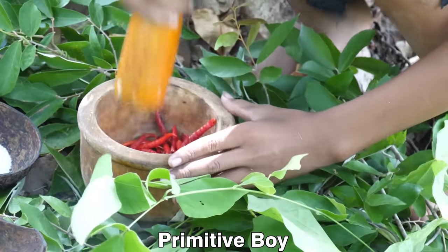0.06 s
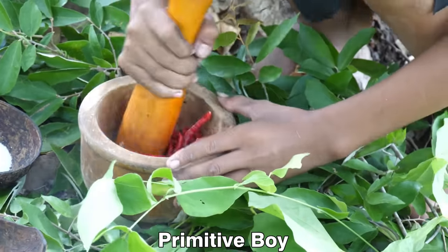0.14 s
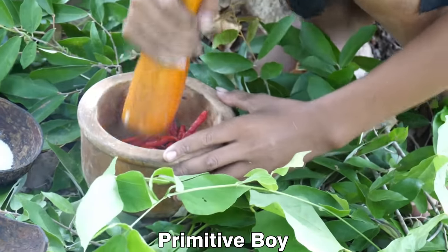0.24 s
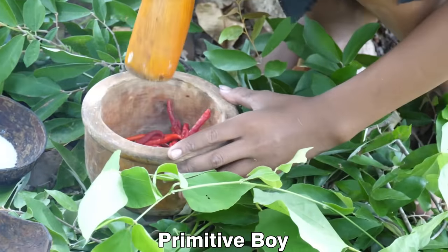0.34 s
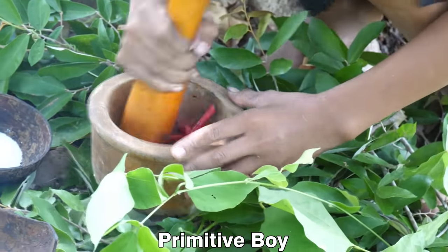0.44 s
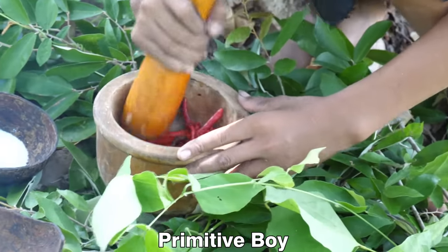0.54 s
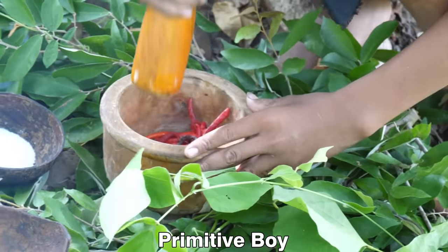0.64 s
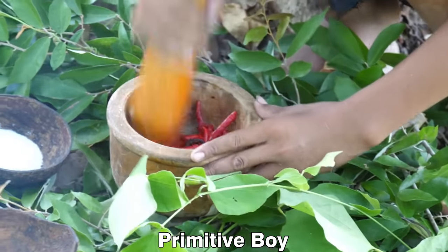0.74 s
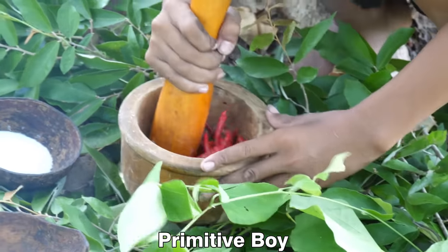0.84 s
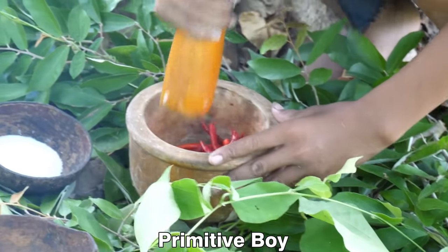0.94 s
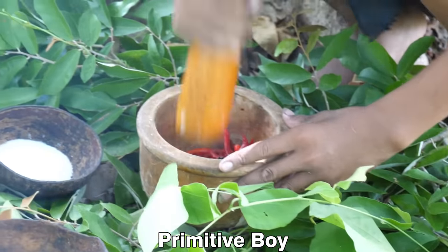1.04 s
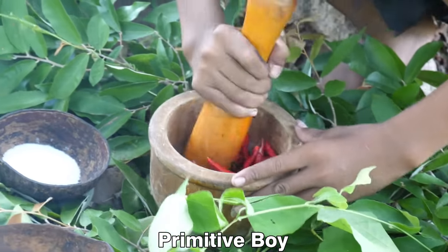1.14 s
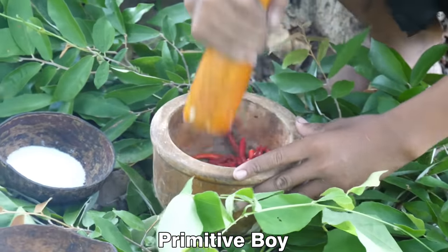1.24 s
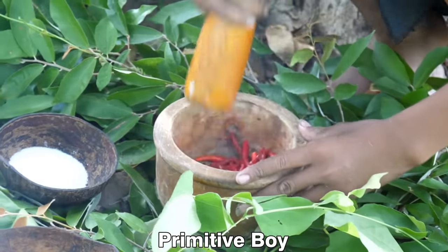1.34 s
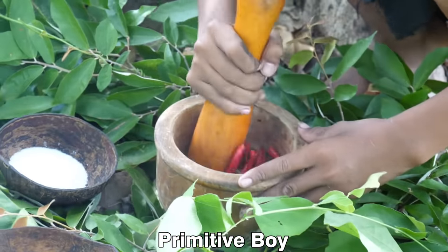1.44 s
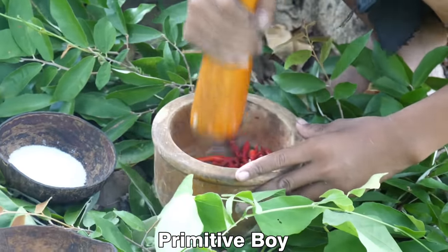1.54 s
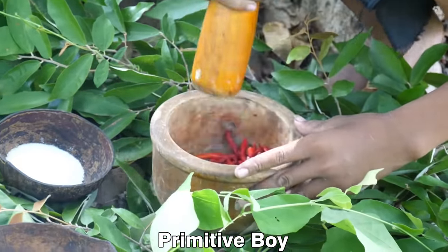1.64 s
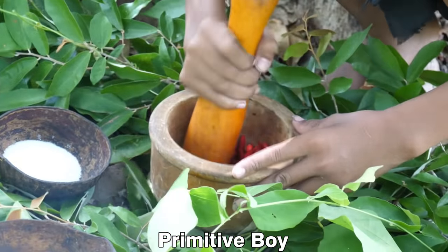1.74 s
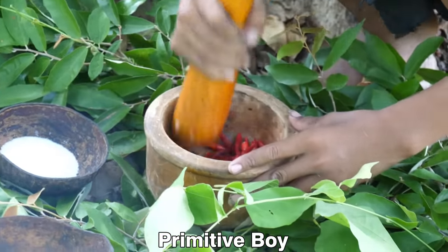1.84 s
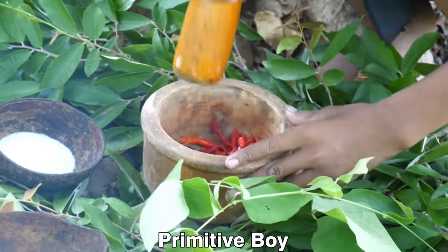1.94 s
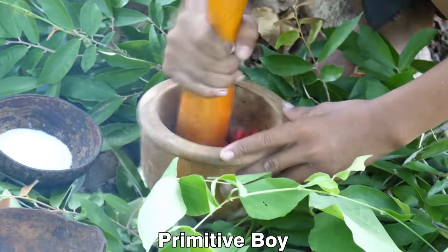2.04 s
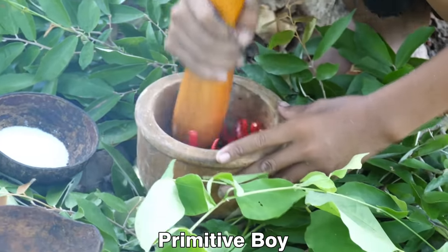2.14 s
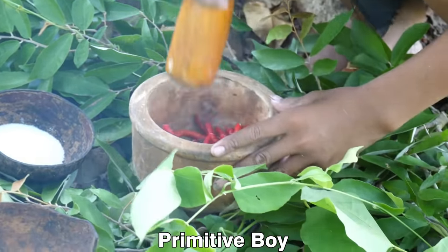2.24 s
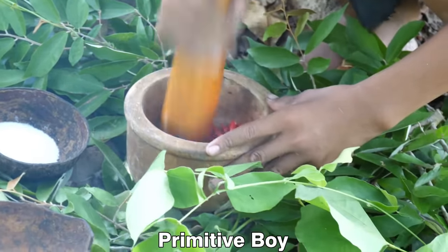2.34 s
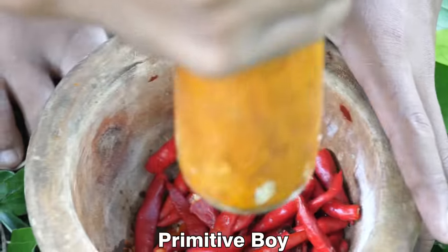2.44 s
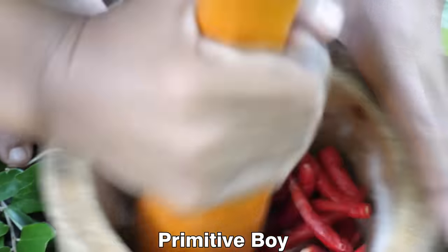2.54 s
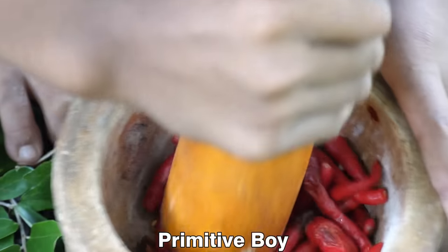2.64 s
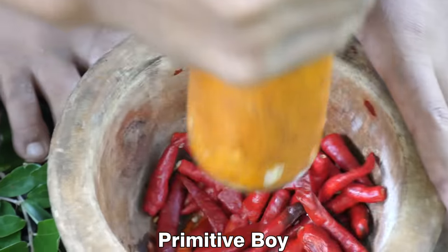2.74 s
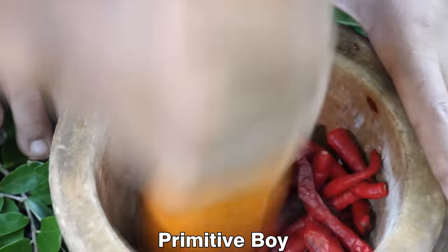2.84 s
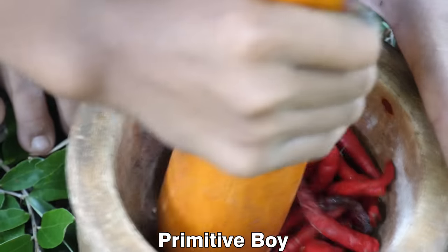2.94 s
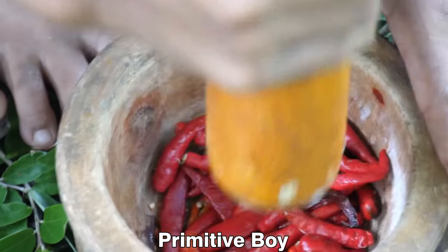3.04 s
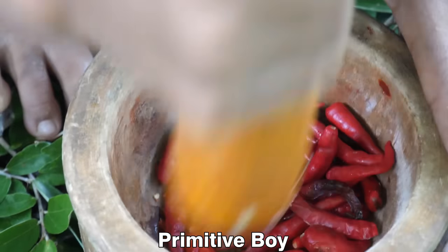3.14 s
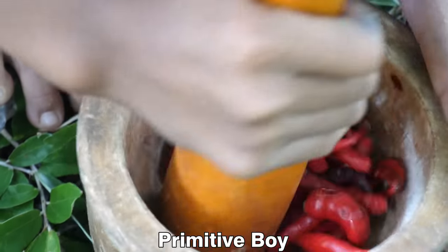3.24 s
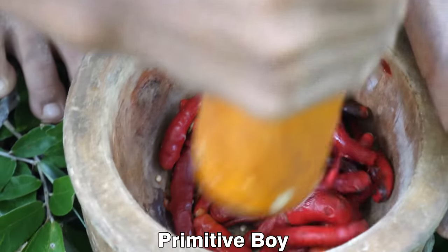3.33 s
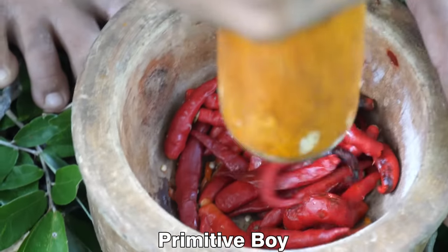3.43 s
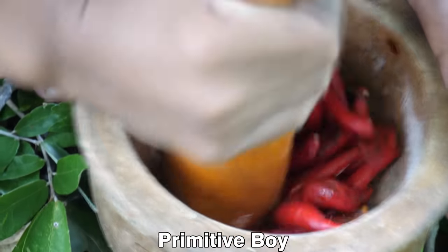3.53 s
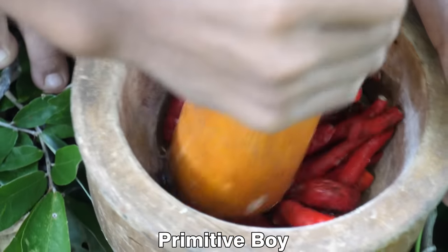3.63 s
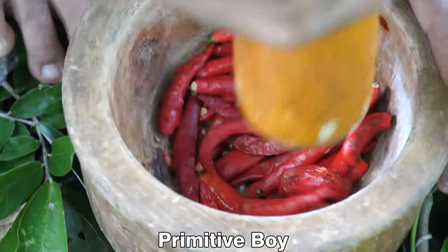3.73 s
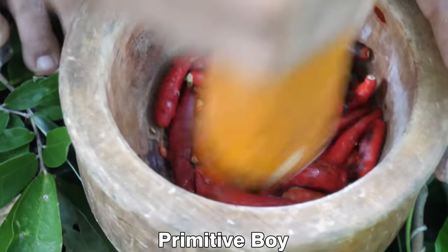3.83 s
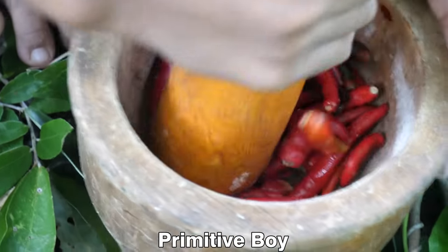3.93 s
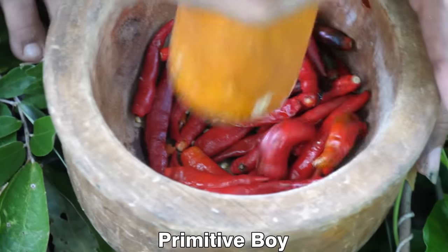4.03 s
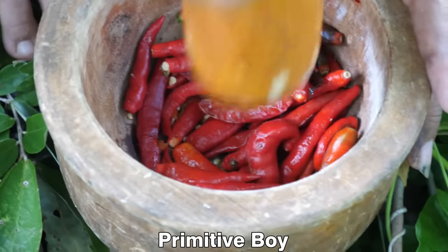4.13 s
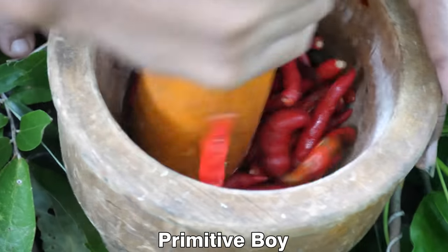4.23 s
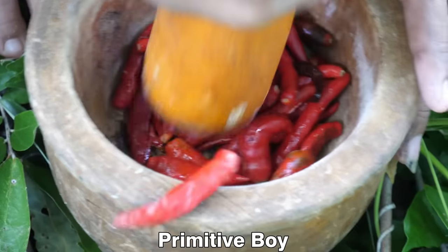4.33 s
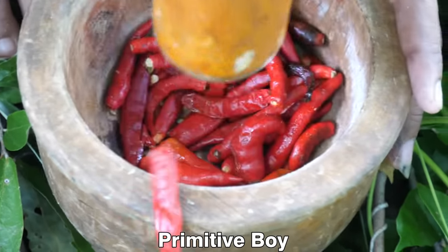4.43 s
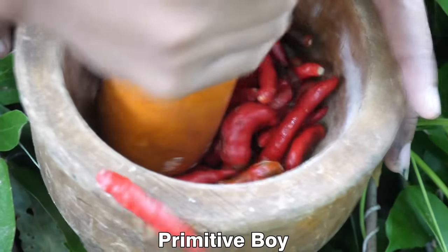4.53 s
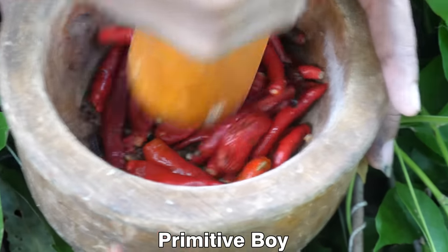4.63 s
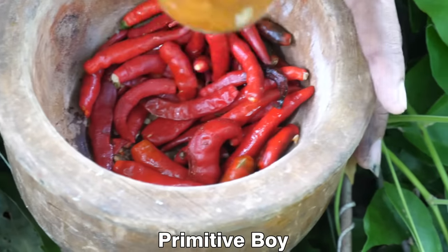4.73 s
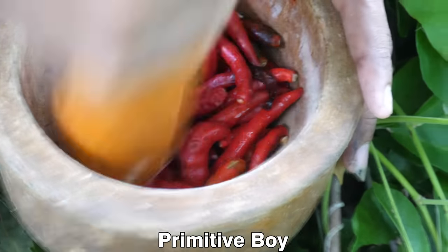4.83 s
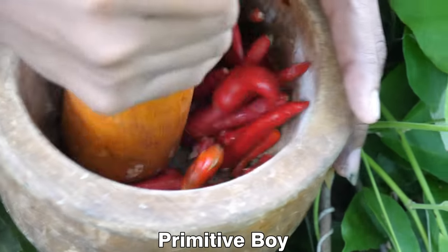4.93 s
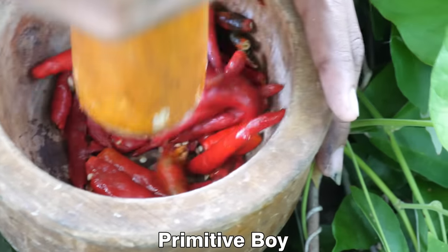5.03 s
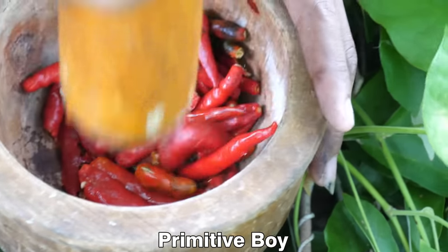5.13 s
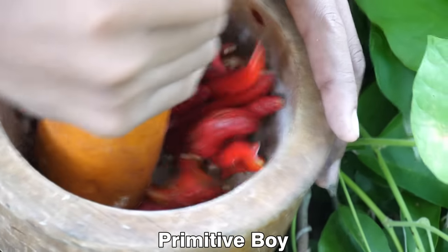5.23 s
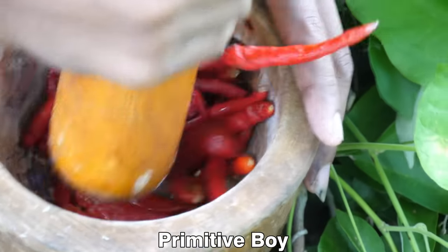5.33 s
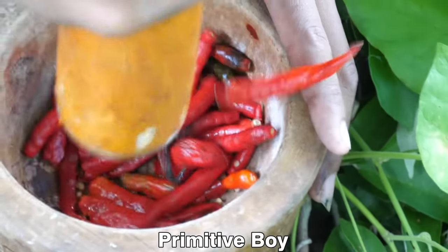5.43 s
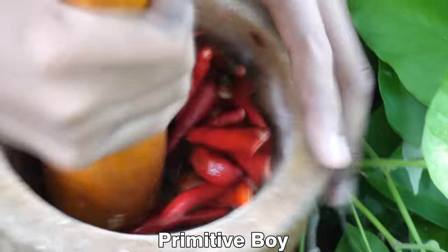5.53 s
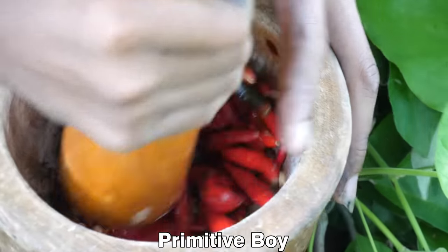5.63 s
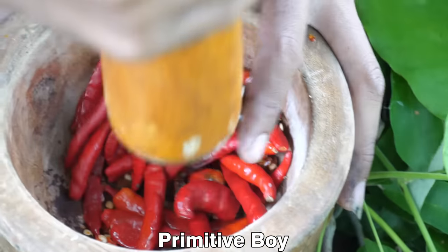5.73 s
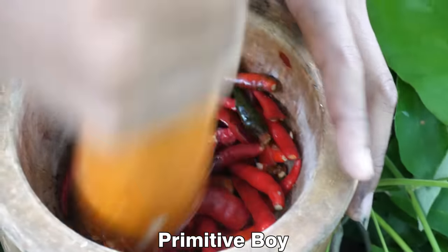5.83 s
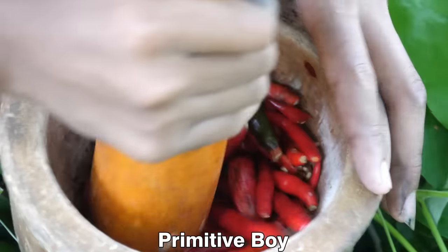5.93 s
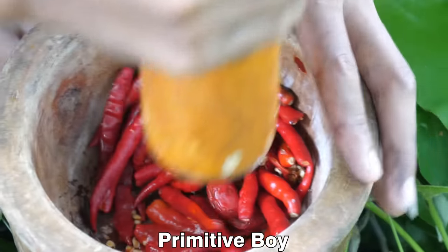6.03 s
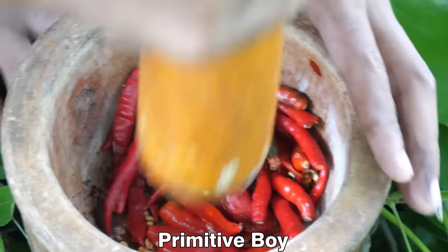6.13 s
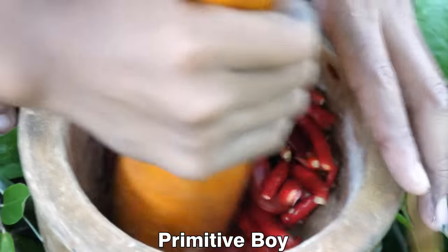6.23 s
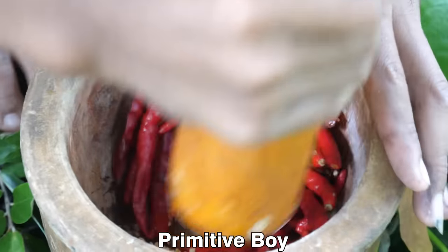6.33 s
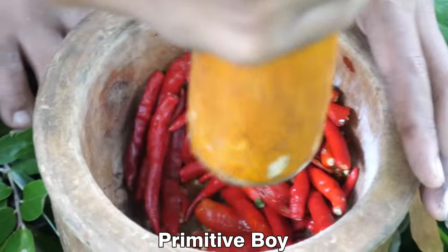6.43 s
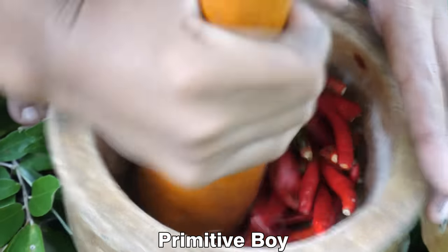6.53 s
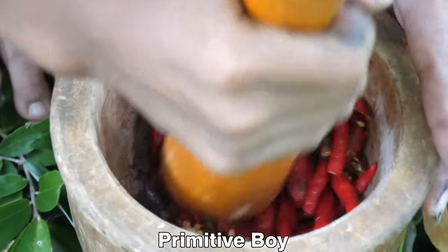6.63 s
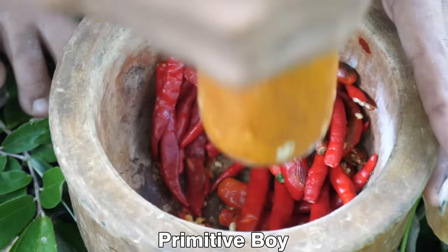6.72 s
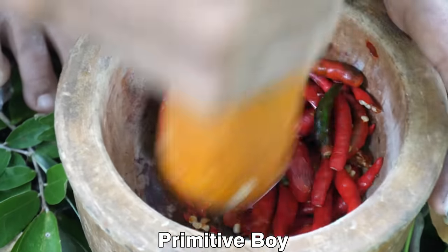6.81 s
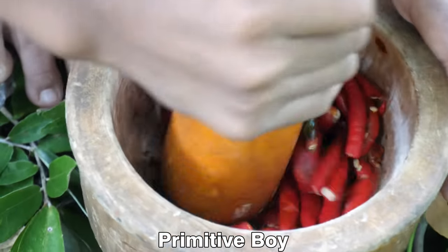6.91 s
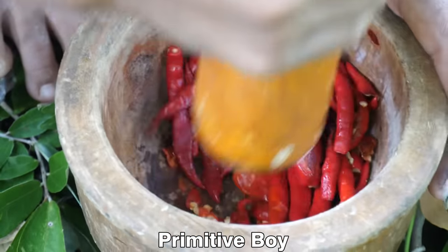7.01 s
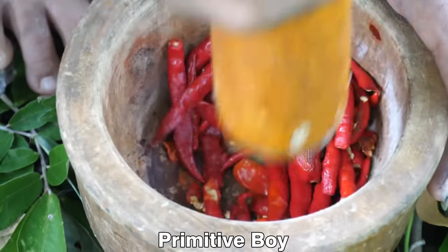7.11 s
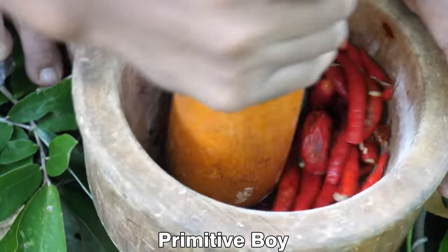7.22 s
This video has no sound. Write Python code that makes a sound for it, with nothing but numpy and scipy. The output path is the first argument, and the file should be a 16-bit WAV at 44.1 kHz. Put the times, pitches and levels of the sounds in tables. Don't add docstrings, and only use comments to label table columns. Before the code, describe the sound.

Close outdoor microphone on a wooden mortar on soft ground. Leaves rustle over low forest air, then a wooden pestle strikes about three times a second. Each blow has a short wet crunch, hollow knock and brief woody ring. Seeds tick and wet skin squeaks faintly between blows. From about 2.6 seconds the knocks grow louder and overload, while the background sinks.

```python
import sys
import numpy as np
from scipy import signal
from scipy.io import wavfile
from scipy.ndimage import uniform_filter1d

SR = 44100
rng = np.random.default_rng(int(sys.argv[2]) if len(sys.argv) > 2 else 0)


def boost_factor(decibels):
    exponent = np.asarray(decibels, float) / 20
    return 10 ** exponent


def int16_out(signal):
    q = np.round(np.clip(np.atleast_2d(signal).T, -1, 1) * 32767)
    wavfile.write(sys.argv[1], SR, q.astype(np.int16))


N = 320607


def rms_one(x):
    return x / np.sqrt(np.mean(x ** 2) + 1e-20)


def at_hz(points, hz):
    point_hz, point_db = np.transpose(points)
    return np.interp(np.log(hz), np.log(point_hz), point_db)


def add(out, s, sound):
    i = round(s * SR)
    out[i:i + len(sound)] += sound[:N - i]


def drift(rate):
    r = np.exp(-80 * np.pi * rate / SR)
    white = rng.standard_normal(N // 40 + 2002)
    slow = signal.lfilter([1], [1, -2 * r, r * r], white)[2000:]
    return np.interp(np.arange(N) / 40, np.arange(len(slow)), rms_one(slow))


def damped(hz, t60):
    t = np.arange(SR // 5) / SR
    return np.sin(2 * np.pi * hz * t) * boost_factor(-60 * t / t60)


def butter(x, order, hz, kind):
    return signal.sosfilt(signal.butter(order, hz, kind, fs=SR, output="sos"), x)


def band(x, hz, octaves, order=1):
    edges = np.clip(hz * 2. ** np.array([-octaves, octaves]), 30, 19000)
    return rms_one(butter(x, order, edges, "band"))


# frequency in Hz, side minus mid in dB.
WIDTH = [(60, -13), (110, -33.5), (200, -18), (380, -21.5), (700, -24.5), (1290, -22.5), (2380, -22.5),
         (4400, -18.5), (8120, -17), (15000, -10)]


def noise(spectrum, patchy_db, grit_db):
    out, together = 0, drift(16)
    edges = 22 * 2 ** np.arange(0, 10, .5)
    white = rng.standard_normal((2, 2, N)) * boost_factor(grit_db * drift(160))
    for k, (low, high) in enumerate(zip(edges, edges[1:])):
        mid, side = butter(white[k % 2], 2, [low, high], "band")
        hz = np.sqrt(low * high)
        gain = boost_factor(at_hz(spectrum, hz) + patchy_db * (.5 * together + drift(4.2)))
        out = out + gain * (mid + boost_factor(at_hz(WIDTH, hz)) * side * [[1], [-1]])
    return rms_one(out)


# frequency in Hz, density in dB per Hz.
FOREST = [(15, -37), (25, -8.5), (129, -1.5), (182, -4.5), (350, -15), (486, 1), (728, -16), (883, -7),
          (1490, -15.5), (2500, -15), (3250, -40), (5500, -120)]


def forest_air():
    return noise(FOREST, patchy_db=2.5, grit_db=2.1)


# frequency in Hz, density in dB per Hz.
RUSTLE = [(530, -31.5), (900, -3.5), (1910, -8.5), (4560, -1), (5410, -11.5), (6640, -6), (7500, -9.5),
          (8160, -8.5), (14600, -17.5), (16300, -34)]


def rustle():
    leaves = noise(RUSTLE, patchy_db=1.7, grit_db=2.2)
    return [rms_one(butter(leaves, 3, 4500, side)) for side in ("low", "high")]


# level in dB, in the order of the blows.
DUCKED_DB = [-46, -54.5, -49, -48, -52.5, -52.5, -54, -51, -60.5, -60.5, -60, -57.5, -58.5, -58, -60.5, -53,
             -53, -46, -62, -56, -57.5, -52]
# time in seconds, level in dB.
CEILING = [(0, -36.5), (1.8, -42.5), (2.9, -41.5), (3.3, -45), (4.6, -50.5), (5.0, -54.5), (6.3, -50.5),
           (6.7, -57.5), (7.27, -56)]
# time in seconds, level in dB.
STIR = [(0, 4), (.14, 0), (.21, 4), (.36, -2.2), (.8, 1.5), (1.38, -1), (1.5, -2.5), (1.76, 9.5),
        (1.82, -1), (2.38, -4.5), (2.5, -0.7), (2.79, -5), (3.3, -1), (3.78, -7), (4.55, -6.5),
        (5.93, -5.6), (6.28, -7.5), (7.27, -9)]
START_DB, RECOVER_DB_PER_S = -42, 31
RUB_PER_DUCK, HISS_DB, HISS_PER_DUCK = 0.13, -1.3, 0.17


def gain_control():
    t = np.arange(N) / SR
    times = np.array([0, *(row[0] for row in BLOWS)])
    last = np.searchsorted(times, t, side="right") - 1
    ceiling_db = np.interp(t, *np.transpose(CEILING))
    climbing_db = np.array([START_DB, *DUCKED_DB])[last] + RECOVER_DB_PER_S * (t - times[last])
    air_db = uniform_filter1d(np.minimum(climbing_db, ceiling_db), size=221)
    duck_db = air_db - ceiling_db
    rub_db = air_db + np.interp(t, *np.transpose(STIR)) + RUB_PER_DUCK * duck_db
    return boost_factor(air_db), boost_factor(rub_db), boost_factor(rub_db + HISS_DB + HISS_PER_DUCK * duck_db)


# start in seconds, length in seconds, pitch in Hz, level in dB.
SQUEAKS = [
    (.05, .12, 4600, -43),
    (1.42, .04, 1680, -38),
    (1.66, .13, 4550, -44),
    (1.67, .07, 6450, -43),
    (1.66, .09, 8100, -50),
    (2.84, .06, 2100, -43),
    (2.83, .07, 950, -48),
    (2.85, .06, 5200, -53),
    (2.84, .06, 3100, -47),
    (4.83, .06, 1980, -55),
]


def squeaks():
    out = np.zeros(N)
    for (s, length, hz, db), white in zip(SQUEAKS, rng.standard_normal((len(SQUEAKS), SR // 5))):
        swell = np.sin(np.pi * np.clip(np.arange(len(white)) / SR / length, 0, 1))
        add(out, s, boost_factor(db) * band(white, hz, 190 / hz, order=2) * swell)
    return out


# start in seconds, peak in dB, pitch in Hz, bright edge in dB.
TICKS = [(0.0718, -22, 4320, -19.5), (.1396, -15.5, 2720, -26), (.753, -22.5, 2680, -4.5),
         (1.3562, -20.5, 6660, -15.5), (1.431, -23, 1640, -8.5), (1.5336, -36, 6300, 4),
         (1.845, -26.5, 1750, -8), (1.871, -24.5, 1260, -28), (2.369, -22.5, 1840, -6.5),
         (2.471, -25, 4080, -11), (2.5325, -28, 1570, -19), (2.6893, -34, 6500, -17),
         (2.7235, -24.5, 4130, -15), (2.7394, -20, 5060, -9.5), (2.801, -19, 4190, -12),
         (2.822, -23, 2730, -17), (2.836, -18.5, 2160, -2.5), (3.803, -30, 3870, -29),
         (3.8192, -32.5, 1980, -24), (4.3844, -37, 1880, -1.5), (4.454, -30, 2650, -22.5),
         (4.4918, -27.5, 5080, -10.5), (4.87, -30, 1430, -6), (5.009, -42.5, 1215, 6),
         (5.194, -32, 2150, -11), (5.745, -32.5, 2430, -27), (5.8422, -27.5, 4170, -26),
         (5.888, -27.5, 1190, -8.5), (6.168, -33, 3030, -2.5), (7.0723, -47.5, 1880, -22)]
# start in seconds, peak in dB, pitch in Hz.
FAINT_TICKS = [(.608, -40, 2840), (2.2832, -33, 4550), (2.443, -35.5, 3300), (2.7646, -39.5, 2187),
               (3.4201, -46, 2050), (4.3445, -33, 4800), (4.4003, -36, 2780), (4.7522, -41.5, 1960),
               (5.7004, -37, 2900), (5.8664, -47, 3470), (6.1938, -37.5, 2300)]
FAINT_EDGE_DB, TICK_DECAY_MS = -15, 2.96


def ticks():
    out, t = np.zeros(N), np.arange(SR // 25) / SR
    snaps = [*TICKS, *((*row, FAINT_EDGE_DB) for row in FAINT_TICKS)]
    envelope = np.exp(-t * 1000 / TICK_DECAY_MS) * (1 - np.exp(-t / 0.00046))
    for (s, db, hz, edge_db), white in zip(snaps, rng.standard_normal((len(snaps), len(t)))):
        colour = band(white, hz, 0.15) + boost_factor(edge_db) * band(white, 7000, 0.97)
        add(out, s, boost_factor(db - 6) * colour * envelope)
    return out


# resonance in Hz, width in Hz, level in dB.
BOWL = [(950, 98, 1.2), (1550, 610, -6.5), (2150, 362, 1), (3183, 367, -1.5)]


def hollow(x):
    out = 0
    for k, (hz, width_hz, db) in enumerate(BOWL):
        r = np.exp(-np.pi * width_hz / SR)
        poles = [1, -2 * r * np.cos(2 * np.pi * hz / SR), r * r]
        out = out + (-1) ** k * boost_factor(db) * signal.lfilter([1 - r * r, 0, r * r - 1], poles, x)
    return rms_one(out)


# start in seconds, length in ms, level in dB, centre in Hz.
CRUSHES = [(.164, 5.9, -7, 3780), (.488, 6.5, -10, 2980), (.8, 31, -32.5, 2827), (1.128, 11.0, -9, 3030),
           (1.461, 3.3, -4, 2680), (1.784, 4.7, -10.5, 3500), (2.588, 13, -14.5, 3680),
           (2.914, 4.8, -7.5, 3550), (3.2334, 5.7, -13, 4180), (3.573, 3.56, -7.5, 2280),
           (3.914, 7.9, -11, 4620), (4.239, 8.9, -15, 3480), (4.563, 6.4, -11.5, 5040),
           (4.897, 6.1, -6, 2260), (5.249, 5.2, -12.5, 2280), (5.569, 2.9, -11, 2130),
           (5.906, 11.2, -21, 1830), (6.245, 8.3, -11.5, 2720), (6.5745, 3.5, -8.5, 2250),
           (6.904, 4.3, -12, 2410), (7.221, 7.7, -28.5, 4100), (7.231, 3.1, -21.5, 8900)]
# start in seconds, length in ms, level in dB, centre in Hz.
POPS = [
    (0.7991, 4.2, -24.5, 3283),
    (.808, 3.2, -18, 3300),
    (1.104, 36, -35, 3000),
    (1.141, 19, -26.5, 4000),
    (1.372, 15, -19, 5970),
    (1.3725, 6.8, -18, 6500),
    (1.379, 6, -22, 3070),
    (5.9128, 4.3, -16.5, 5764),
    (6.238, 6.3, -30, 2698),
]
CRUSH_SWELL, POP_SWELL = 0.59, 0.12


def crushes():
    out, t = np.zeros(N), np.arange(SR // 12) / SR
    bursts = [(*row, CRUSH_SWELL) for row in CRUSHES] + [(*row, POP_SWELL) for row in POPS]
    shape = (len(bursts), len(t))
    draws = rng.standard_normal(shape) * rng.exponential(1, shape) ** .9
    sizzle = boost_factor(-23.5) * np.exp(-t / 0.016)
    for (s, length_ms, db, hz, swell), snaps in zip(bursts, draws):
        length = length_ms / 1000
        rise = np.clip(t / (swell * length), 0, 1) ** 1.5
        fall = np.exp(-np.maximum(t - length, 0) / 0.0011) + sizzle
        pods = band(snaps, hz, 0.69, order=2)
        in_bowl = 0.52 * (3000 / hz) ** 0.64 * hollow(snaps)
        colour = pods + in_bowl + 0.085 * band(snaps, 5800, 0.76)
        add(out, s, boost_factor(db - 3.0) * colour * rise * fall)
    return out


# start in seconds, knock peak in dB, knock in Hz, pestle ring in dB, crack in dB.
BLOWS = [(0.1713, -4.5, 462, -22.5, -3.5), (.4942, 4, 950, -13.5, -4.5), (.817, -1, 1070, -7, -6),
         (1.1389, 2.3, 766, -23, -14), (1.4645, 4, 924, -9, -17), (1.7897, -.6, 473, -17, -10.5),
         (2.0988, -5.5, 1040, -7.5, -2.8), (2.601, 4, 643, -39.5, -11), (2.9206, 8, 680, -28, -11.5),
         (3.2387, 6.5, 950, -11, -15), (3.5789, 0.5, 914, -27, -5.5), (3.922, 10, 690, -20.5, -8.5),
         (4.2456, 11, 698, -13, 2), (4.5699, 10, 712, -21, -4.5), (4.9078, 2.5, 904, -36.5, -29.5),
         (5.2578, -3, 710, -41, -33), (5.5758, 1.3, 780, -43.5, -12), (5.9151, 5.5, 1026, -20, 2),
         (6.2511, 8, 937, -20, -12), (6.5768, 6, 695, -9, -2.5), (6.9065, 7.5, 816, -26, -6.5),
         (7.2359, 3, 707, -34, -10.5)]
# start in seconds, knock peak in dB, knock in Hz,
# pestle ring in dB, crack in dB.
TOUCHES = [(0.1668, -15.5, 1288, -35, 5), (0.4935, -2, 1523, -2.5, 8), (0.8021, -9.5, 990, -12.5, -7.5),
           (.811, -5.5, 1055, -8.5, -2.5), (1.1343, -5.5, 1152, -51, 5), (1.4638, -0.5, 1197, -20.5, -6),
           (1.7914, -0.5, 890, -28, -24.5), (2.0914, -5.5, 1190, -4, 0), (2.5934, -3.5, 896, -27, -5.5),
           (2.5981, 2.6, 1016, -42, -5), (2.9183, 3, 938, -30.5, 4), (3.2403, 5.8, 811, -38, -23.5),
           (3.5711, -15, 1060, -27.5, -19), (3.575, 4, 1195, -30, -0.8), (3.5761, 0.5, 900, -10, -27),
           (4.2451, 3.5, 1513, -32, -20.5), (4.8999, 6.5, 1500, -8, -6), (5.2498, 2.5, 1300, -28, -30),
           (5.2522, 1, 1042, -13.5, 0.5), (5.5692, 3, 1291, -14, -8), (5.5734, -10.5, 930, -29, -25.5),
           (6.252, 4.5, 861, -23, -12.5), (6.5778, -5, 802, -32, -13), (6.9079, 2.5, 850, -16.5, -29.5)]
# pitch in Hz, level in dB, t60 in seconds.
PESTLE = [(1190, 0, .062), (2255, -13, .045), (3250, -15, .02), (1197, -25, .13), (3570, -39, .11),
          (2275, -34, .12)]
# pitch in Hz, level in dB, t60 in seconds.
MORTAR = [(950, -17, 0.031), (272, -27, 0.018), (1500, -11.5, 0.0049), (410, -20.5, 0.013)]
# pitch in Hz, t60 in seconds.
GROUND = (106, 0.075)
KNOCK_SWELL_CYCLES, CRACK_T60_S = 0.65, 0.011
THUMP_DB, THUMP_DB_PER_OCTAVE, DEEP_HZ = -25, -7, 720


def knocks():
    out, t = np.zeros(N), np.arange(SR // 5) / SR
    contacts = [*BLOWS, *TOUCHES]
    chance = rng.normal(0, 3.5, (len(contacts), 10))
    chance[:, 0] = 0
    hiss = rng.standard_normal((len(contacts), len(t)))
    for (s, knock_db, hz, ring_db, crack_db), luck, white in zip(contacts, chance, hiss):
        age = t * hz / KNOCK_SWELL_CYCLES
        bowl = boost_factor(knock_db) * np.sin(2 * np.pi * hz * t) * (age * np.exp(1 - age)) ** 2.29
        ring = sum(boost_factor(ring_db + db + u) * damped(f, t60) for (f, db, t60), u in zip(PESTLE, luck))
        body = sum(boost_factor(knock_db + db + u) * damped(f, t60) for (f, db, t60), u in zip(MORTAR, luck[6:]))
        crack = boost_factor(crack_db - 2.5) * hollow(white) * boost_factor(-60 * t / CRACK_T60_S)
        add(out, s - .5 / hz, bowl)
        add(out, s, crack - (ring + body) * (1 - np.exp(-t / 0.00027)))
    for s, _, hz, *_ in BLOWS:
        thump_db = THUMP_DB + THUMP_DB_PER_OCTAVE * np.log2(hz / DEEP_HZ)
        add(out, s, boost_factor(thump_db) * damped(*GROUND) * (1 - np.exp(-t / .003)))
    return out


# centre in Hz, t60 in seconds, level in dB.
TREES = (1300, 0.13, -35)


def trees(x):
    hz, t60, db = TREES
    t = np.arange(SR // 4) / SR
    mid, side = rng.standard_normal((2, len(t))) * boost_factor(-60 * t / t60) * (1 - np.exp(-t / 0.022))
    tails = [band(mid + sign * 0.065 * side, hz, 3.0) / np.sqrt(len(t)) for sign in (1, -1)]
    return boost_factor(db) * np.array([signal.fftconvolve(x, tail)[:N] for tail in tails])


def scene():
    air_gain, rub_gain, hiss_gain = gain_control()
    rub, hiss = rustle()
    background = air_gain * forest_air() + rub_gain * rub + hiss_gain * hiss
    mortar = squeaks() + ticks() + crushes() + knocks()
    treble = butter(mortar, 1, 6000, "high")
    late = boost_factor(-28.0) * np.roll(treble, 9) + boost_factor(-37.5) * np.roll(mortar, 30)
    spread = late * [[1], [-1]]
    return mortar + spread + trees(np.clip(mortar, -1, 1)) + background


def band_limit(x):
    return signal.sosfilt(signal.butter(12, 16430, fs=SR, output="sos"), x)


def record(dry):
    flat = np.clip(dry, -.97, .97)
    cut = signal.sosfilt(signal.cheby2(10, 50, 16300, fs=SR, output="sos"), flat)
    return band_limit(cut)


dry = scene()
out = record(dry)
int16_out(out)
```